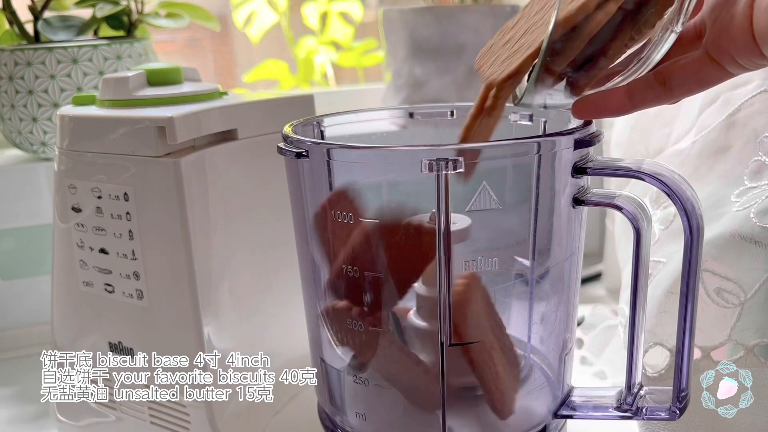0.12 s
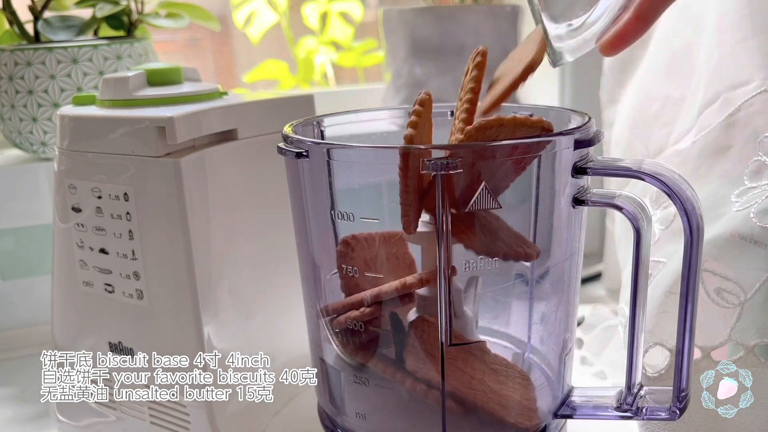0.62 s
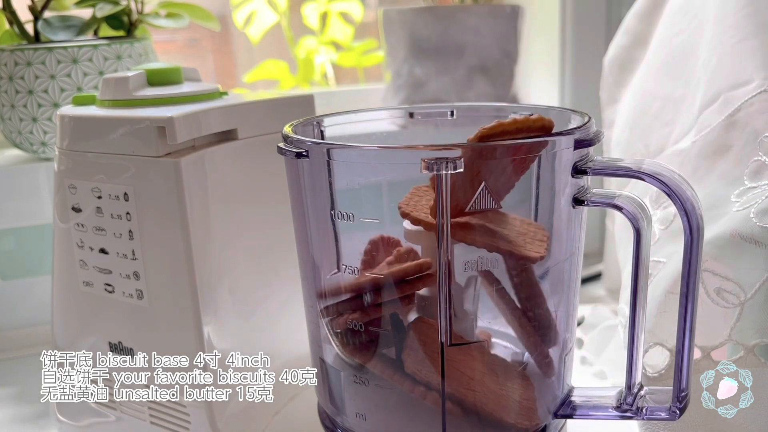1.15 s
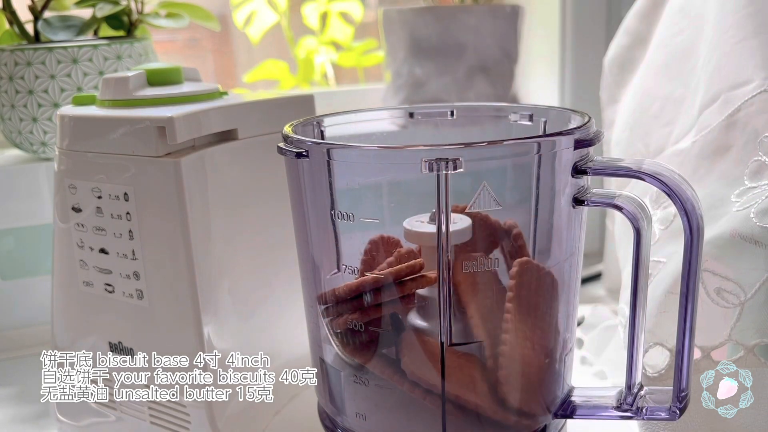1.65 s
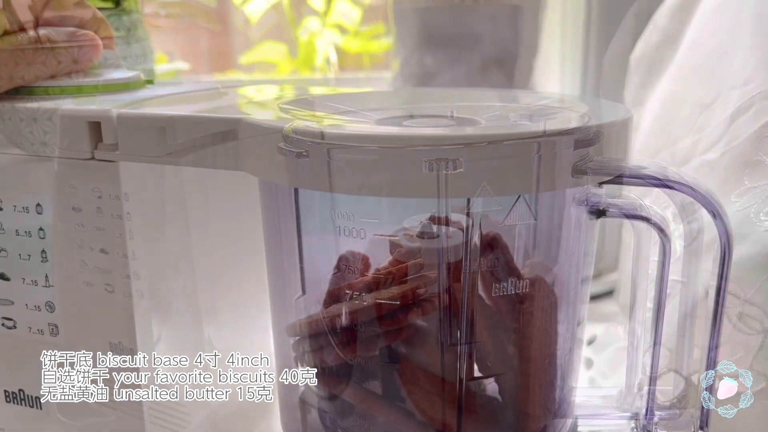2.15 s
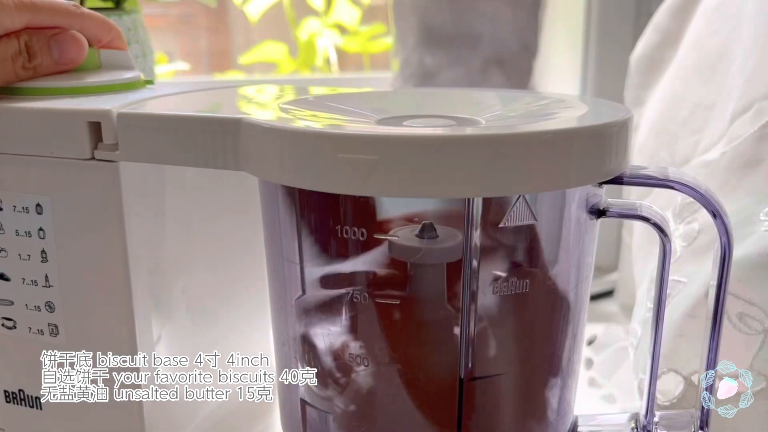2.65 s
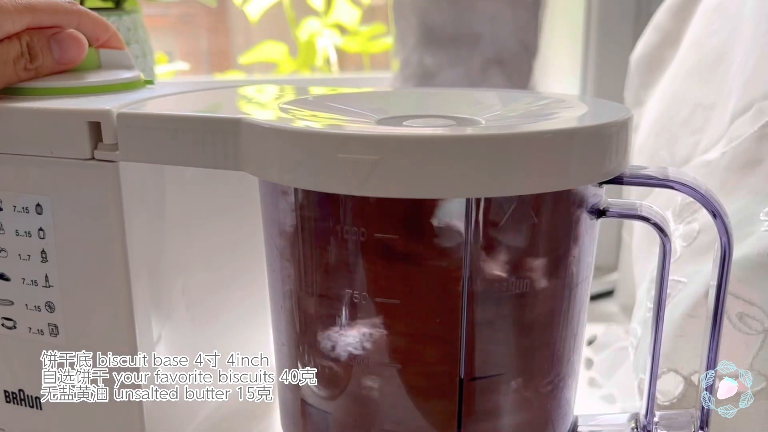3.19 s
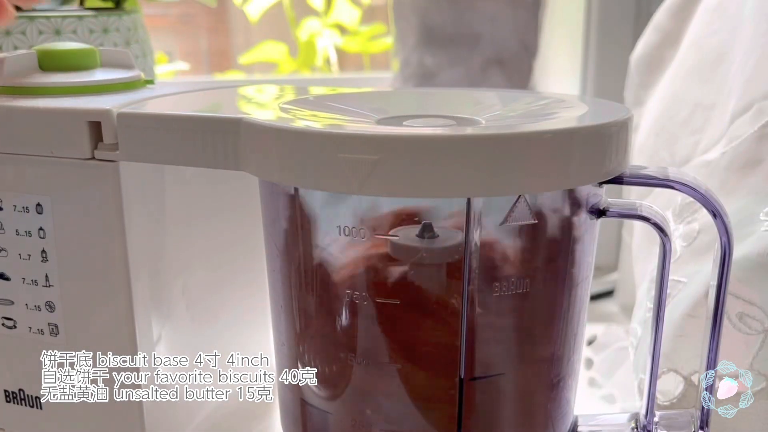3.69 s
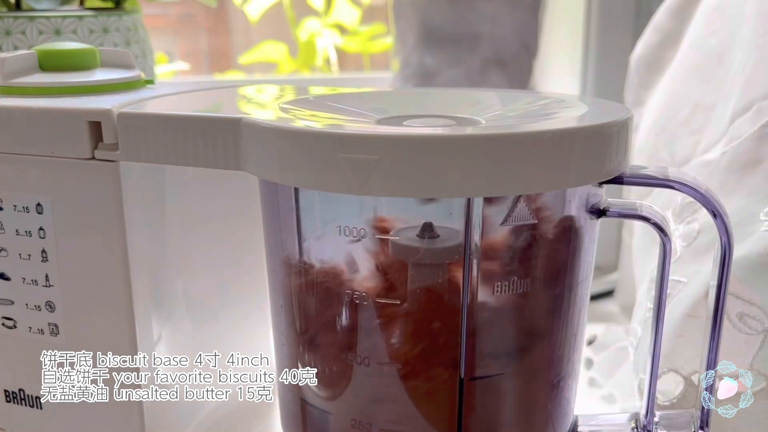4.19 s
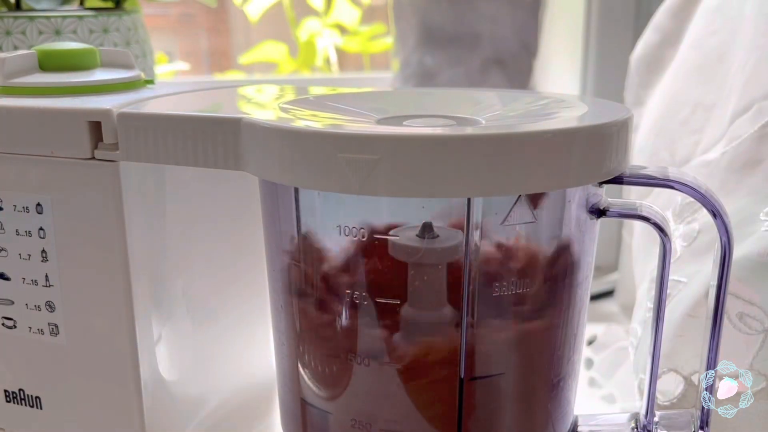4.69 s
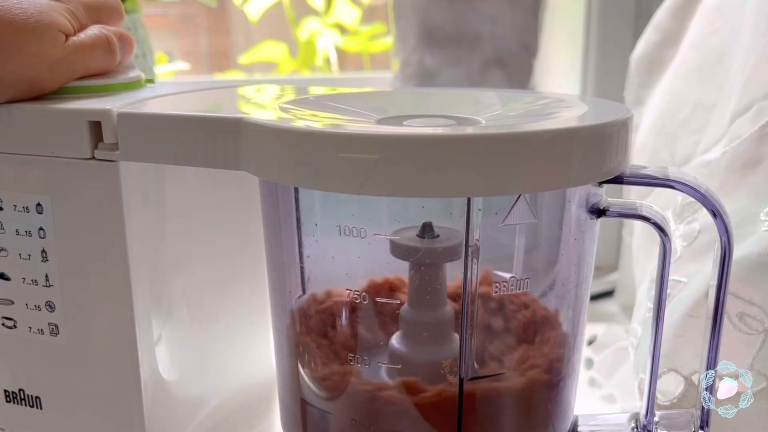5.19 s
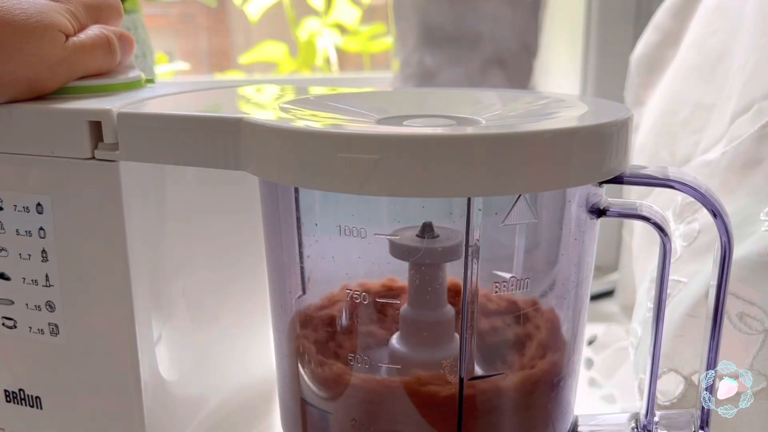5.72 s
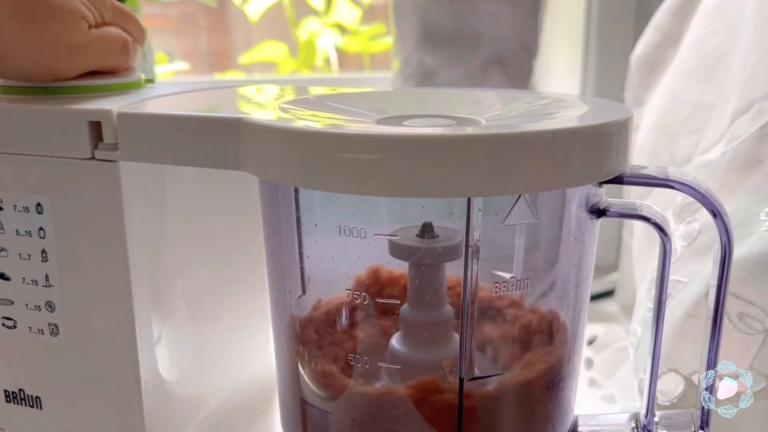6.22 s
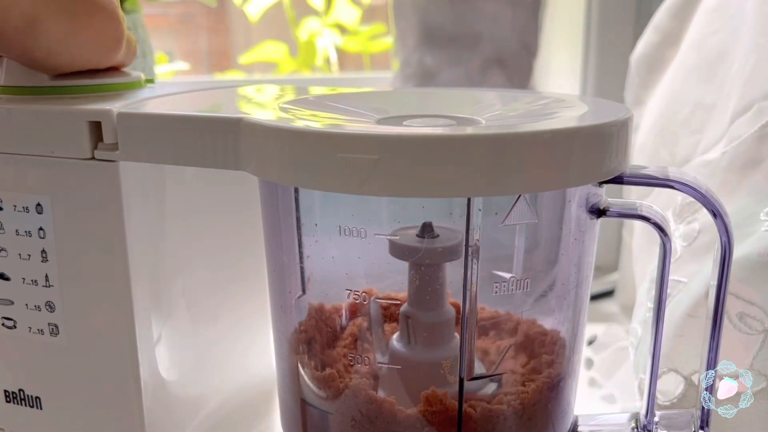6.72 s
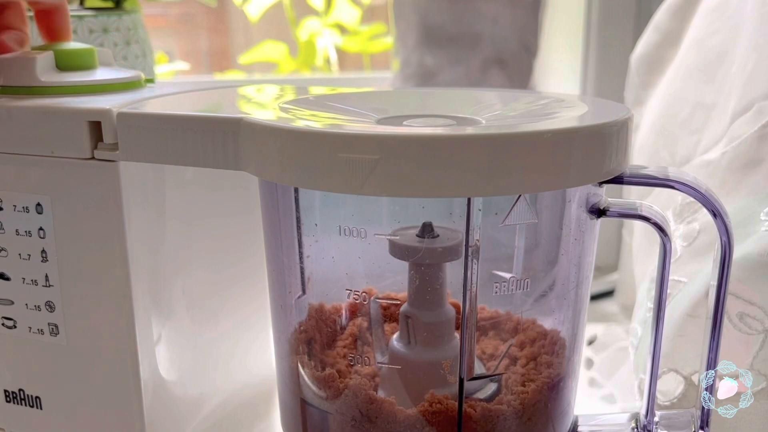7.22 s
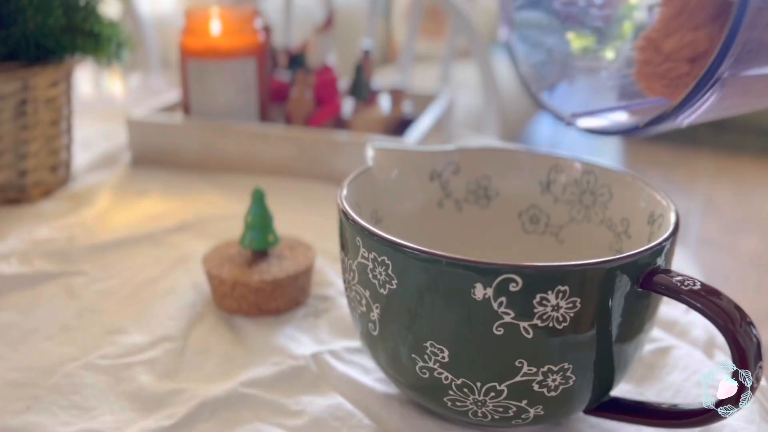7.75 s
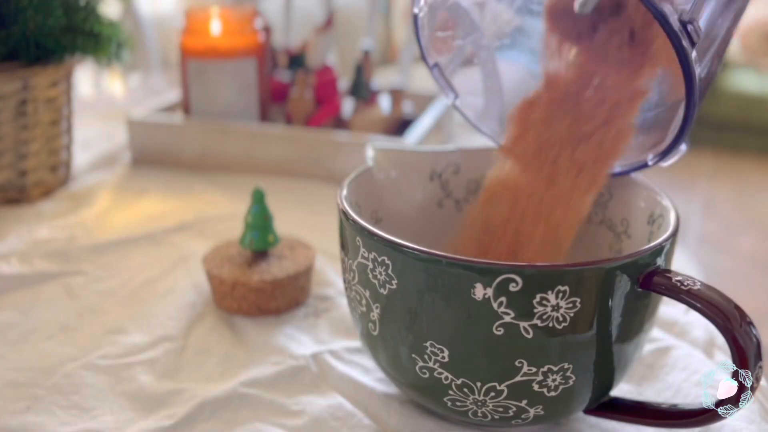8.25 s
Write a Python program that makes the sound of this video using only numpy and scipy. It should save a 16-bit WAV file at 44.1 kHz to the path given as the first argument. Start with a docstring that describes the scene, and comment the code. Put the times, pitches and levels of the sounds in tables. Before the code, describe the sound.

Hard biscuits clatter into a plastic food processor jug, a knob clicks, the blade chops and whirs, then coasts down before crumbs pour out.

```python
"""Hard biscuits tumble into the plastic jug of a food processor: struck modes of jug, hub and blade, with rattle.
The knob clicks and the blade chops them, then stirs the crumbs: impact noise pulsing with the shaft under a
gear whine of mesh tones. The drive coasts to a stop with rumble, catches and squeaks, and the crumbs are
poured out as a dry hiss. Noise echoes stand for the kitchen; background rumble and hiss step in level beneath."""
import sys
import numpy as np
from scipy import signal
from scipy.fft import rfft, irfft, next_fast_len
from scipy.io import wavfile
from scipy.ndimage import uniform_filter1d

SR = 44100
rng = np.random.default_rng(int(sys.argv[2]) if len(sys.argv) > 2 else 0)


def ratio_of_db(decibels):
    """Turn decibels (scalar or array-like) into linear amplitude factors; 0 dB maps to 1."""
    return 10 ** (np.asarray(decibels, float) / 20)


def to_wav(sig):
    """Store sig (one row per channel, or 1-D mono) as 16-bit WAV at the path in sys.argv[1].

    Samples outside -1..1 are clipped; the rate is SR.
    """
    pcm = np.clip(np.atleast_2d(sig), -1, 1) * 32767
    pcm = np.round(pcm).astype(np.int16)
    wavfile.write(sys.argv[1], SR, pcm.T)  # frames by channels


N = 369116

# pieces striking jug and hub, with a late knob click at 6.75: start_s, knock_peak_db, tick_peak_db, hub_spot_hz
BLOWS = [(0.021, -32, -28.5, 2450), (0.032, -16, -47, 1980), (0.054, -34, -20, 1960),
         (.062, -12.5, -39, 1980), (0.078, -41, -38, 1910), (.106, -15, -22, 1730), (.116, -19, -26, 1900),
         (0.134, -23.5, -19, 2420), (0.146, -8, -18, 2190), (.2, -23, -32, 1630), (.231, -24.5, -29, 1618),
         (0.2433, -18, -9.5, 1620), (0.313, -13, -27.5, 2150), (0.363, -33, -22.5, 1920),
         (.404, -31, -33, 1900), (0.45, -32.5, -32, 1920), (0.475, -38.5, -28, 1910),
         (0.491, -28, -65, 1910), (0.508, -18.5, -23, 1770), (0.527, -21, -47, 1910),
         (0.546, -22, -45, 1910), (0.595, -32, -31, 1260), (0.613, -21, -33.5, 1690),
         (0.64, -46, -30, 1630), (0.649, -22, -61, 1630), (0.69, -31.5, -26.5, 1870),
         (.708, -20, -27.5, 1920), (0.783, -25.5, -69, 1910), (.822, -26, -31, 1880),
         (.836, -21.5, -27, 1920), (0.966, -24, -41.5, 1520), (0.987, -26.5, -31, 1910),
         (1.016, -26, -26.5, 1810), (1.041, -24, -26.5, 1930), (1.07, -30, -23, 1730),
         (1.102, -30.5, -32, 1930), (1.127, -29, -34.5, 1630), (1.164, -26, -35, 2130),
         (1.175, -33, -49, 2110), (1.2145, -25.5, -21, 1870), (1.317, -34.5, -72, 1420),
         (1.357, -24.5, -37, 1460), (1.4, -31.5, -20.5, 1690), (1.417, -26.5, -26, 1210),
         (1.448, -34, -20.5, 1730), (1.553, -38.5, -49, 1410), (1.594, -37, -48, 1750),
         (1.641, -27, -41, 1350), (1.68, -40, -58, 1305), (2.699, -27, -35, 1406),
         (2.726, -26.5, -24.5, 2150), (6.652, -33, -54, 1430), (6.691, -49, -71, 1410),
         (6.75, -35, -47.5, 2330)]
# chunks that the blade throws at the hub: start_s, level_db, hub_spot_hz
CHUNKS = [(2.961, -38, 2090), (3.0189, -28.5, 2520), (3.1434, -32, 2390), (3.3053, -35, 2350),
          (3.4087, -39, 2210), (3.579, -31.5, 1760), (3.782, -44, 2440), (3.976, -37, 2200),
          (4.753, -42, 2380), (5.4377, -42, 2110), (5.6793, -43, 2200), (5.7267, -42, 1780),
          (5.8258, -39, 2280), (5.8999, -40, 2180), (5.9637, -43, 1900), (6.18, -40, 2130),
          (6.2483, -39, 2400), (6.489, -41, 2150), (6.628, -40.5, 1650)]
# plastic jug modes, empty and undamped: mode_hz, level_db, t60_s
JUG_MODES = [(345, -15, 0.06), (420, -11, 0.07), (495, -7.5, 0.017), (558, 3, 0.07), (645, 2, 0.04),
             (722, 1, 0.055), (836, -6, 0.06), (960, -2, 0.045), (1090, -5.5, .04), (1190, -4, 0.03)]
# hub modes, undamped: mode_hz, level_db, t60_s
HUB_MODES = [(1230, -4, .025), (1420, -4, 0.035), (1620, -1.5, 0.08), (1765, -1.5, 0.06),
             (1908, -1.5, 0.085), (2106, -4.5, .04), (2330, -3, 0.04)]
# blade modes, undamped: mode_hz, level_db, t60_s
BLADE_MODES = [(2910, -6, .018), (3790, -4, .016), (4470, 0, .018), (4985, -4, .035), (5545, -5, .016),
               (5960, -5, .016)]
# colour of a tick: freq_hz, density_db
TICK_COLOUR = [(1200, -11.5), (2000, -1), (3100, -7), (3700, -8), (4500, -9.5), (5100, -12), (6200, -14.5),
               (8800, -12), (12000, -19), (16000, -18.5)]
FILL_S, FULL_T60_SHARE = 1.3, 0.5  # the filling jug rings ever shorter, down to this share
KNOCK_SPOT_HZ = 535
BLADE_DB = 2.5  # against the tick
HUB_DB = -1.5  # against the mean of knock and tick
CHUNK_TICK_DB, CHUNK_RING_DB = 2.5, -1.5
TICK_CRUMBLE_DB = 6


def blows():
    """Each blow knocks the jug, ticks, snaps on the blade and rings the hub; thrown chunks only tick and ring."""
    out = np.zeros(N)
    for s, knock_db, tick_db, hz in BLOWS:
        t60_share = max(1 - (1 - FULL_T60_SHARE) * s / FILL_S, FULL_T60_SHARE)
        jug = JUG_MODES * np.array([1, 1, t60_share])
        hub_db = (knock_db + tick_db) / 2 + HUB_DB
        add(out, s, ratio_of_db(knock_db) * struck(jug, KNOCK_SPOT_HZ, 7.9, 6.6, contact_samples=330))
        add(out, s, ratio_of_db(tick_db) * crack(TICK_COLOUR, 0.0079, -14.5, 0.069, 2700, 6.1, TICK_CRUMBLE_DB))
        add(out, s, ratio_of_db(tick_db + BLADE_DB) * struck(BLADE_MODES, 4500, 0, 3.5, contact_samples=36))
        add(out, s, ratio_of_db(hub_db) * struck(HUB_MODES, hz, 64, 4.2, contact_samples=200))
    for s, db, hz in CHUNKS:
        tick = crack(TICK_COLOUR, 0.019, -15, 0.2, 3700, 1.0, TICK_CRUMBLE_DB)
        add(out, s, ratio_of_db(db + CHUNK_TICK_DB) * tick)
        add(out, s, ratio_of_db(db + CHUNK_RING_DB) * struck(HUB_MODES, hz, 31, 2.7, contact_samples=200))
    return out


# pieces scraping along the wall: start_s, length_s, level_db
SCRAPES = [(0.103, 0.087, -36), (0.307, 0.049, -28.5), (0.515, 0.012, -33.5), (0.685, 0.042, -32),
           (0.832, 0.047, -47.5), (0.887, 0.13, -47.5), (1.155, 0.0043, -38.5), (1.314, 0.012, -52),
           (1.395, 0.086, -48), (1.512, 0.1, -53.5), (1.629, 0.052, -54.5), (1.712, 0.031, -63.5)]
SCRAPE_RISE_S, SCRAPE_END_DB_PER_S, SCRAPE_GRIT_DB = 0.0066, 498, -10.5
RATTLE_BODY_DB, RATTLE_GRIT_DB, RATTLE_RISE_S, RATTLE_DB_PER_S = -23.5, -43.5, 0.0074, 239.5
# the heap slides down until it has settled
SETTLED_S, HEAP_DB, HEAP_DB_PER_S, HEAP_GRIT_DB, SETTLED_DB_PER_S = 1.24, -37.5, -25.5, -8.5, 156


def tumble():
    """Many small contacts after each blow, in scrapes and as the heap settles, ringing the same plastic."""
    response = ring(JUG_MODES, 0) + 0.1 * ring(HUB_MODES, 0)
    body = high(signal.oaconvolve(grit(1200, 1.7, 3.2, 0.02), response)[:N], 260)
    # treble in four bands that clump independently
    fizz = sum(coloured(grit(1500, 1.8, 4.9, 0.0048),
                        lambda f: read(TICK_COLOUR, f) - 12.0 * np.log2(f / hz + 1e-9) ** 2)
               for hz in (2200, 4630, 8980, 14970))
    t = np.arange(SR // 2) / SR
    rattle = np.minimum(t / RATTLE_RISE_S, 1) * ratio_of_db(-RATTLE_DB_PER_S * t)
    body_gain, fizz_gain = np.zeros((2, N))
    for s, knock_db, tick_db, _ in BLOWS:
        add(body_gain, s, ratio_of_db(knock_db + RATTLE_BODY_DB) * rattle)
        add(fizz_gain, s, ratio_of_db(tick_db + RATTLE_GRIT_DB) * rattle)
    heap = spell(0, SETTLED_S, HEAP_DB, HEAP_DB_PER_S, 0.0011, SETTLED_DB_PER_S)
    scrape = sum(spell(*row, 0, SCRAPE_RISE_S, SCRAPE_END_DB_PER_S) for row in SCRAPES)
    body_gain = body_gain + heap + scrape
    fizz_gain = fizz_gain + ratio_of_db(HEAP_GRIT_DB) * heap + ratio_of_db(SCRAPE_GRIT_DB) * scrape
    return body_gain * level(body, 210, 1800) + fizz_gain * level(fizz, 2700, 11000)


# blade at work, first spell chops, the rest stir crumbs: start_s, length_s, level_db, drift_db_per_s
SPELLS = [(2.693, 2.105, -43, -2), (4.796, .27, -57, 4.5), (5.069, 1.605, -51, 0.4)]
# colour of chopped pieces: freq_hz, density_db
COARSE = [(59, -49), (100, -18), (240, -13.5), (350, -0.5), (471, 0.5), (705, -1.5), (900, -11), (1020, -9),
          (1135, -4), (1300, -14), (1520, -23), (2220, -15.5), (2690, -19.5), (8640, -21), (12400, -24),
          (16000, -23.5)]
# colour of stirred crumbs: freq_hz, density_db
FINE = [(60, -29), (250, -17), (450, 0), (560, -8), (650, -9), (740, -9.5), (880, -17.5), (1150, -11.5),
        (1400, -19), (1850, -17), (2200, -11.5), (2600, -16), (4500, -17.5), (8500, -19.5), (16000, -25.5)]
SHAFT_HZ, TEETH = 28.58, 26
SPIN_UP_S, CHOP_END_DB_PER_S, STOP_DB_PER_S = 0.012, 3000, 295
BITE_S, BITE_DB, BITE_DB_PER_S = 2.712, -49.5, 147  # the blade first bites into whole pieces
SPRAY_DB, BITE_SPRAY_DB = -3.5, 3  # against the body
SURGE_DB = 0.6  # the load surges a few times a second
CRACKLE, THUMPS = 0.35, 0.3  # shares of single snapping crumbs and of single heavy thumps


def churn():
    """Pieces, then crumbs, are flung at the wall: a drumming body and a finer spray pulsing with each turn."""
    t = np.arange(N) / SR
    pulse = 1 + 0.018 * np.cos(2 * np.pi * SHAFT_HZ * t)
    chop = spell(*SPELLS[0], SPIN_UP_S, CHOP_END_DB_PER_S)
    bite = spell(BITE_S, 0, BITE_DB, 0, SPIN_UP_S, BITE_DB_PER_S)
    stages = ((COARSE, chop, bite, 5000, 1.7), (FINE, stirring([0, 0]), 0, 7000, 1.1))
    out = 0
    for colour, load, first_bite, per_s, clump_db in stages:
        spray = grit(per_s, 1.0, clump_db, 0.015) + CRACKLE * grit(500, 0.73, 3.0, 0.005)
        spray = spray * pulse
        drum = 0.89 * spray + grit(per_s, 1.74, 0.45, 0.0081) + THUMPS * grit(150, 2.2, 2.5, 0.012)
        drum = drum * ratio_of_db(SURGE_DB * slow_noise(N, 1500, 1500))
        # crossover at 1600 Hz
        body = coloured(drum, lambda f: read(colour, f) - 40 * np.clip(np.log2(f / 1600 + 1e-9), 0, 3))
        fizz = coloured(spray, lambda f: read(colour, f) + 40 * np.clip(np.log2(f / 1600 + 1e-9), -3, 0))
        fizz_gain = ratio_of_db(SPRAY_DB) * load + ratio_of_db(BITE_SPRAY_DB) * first_bite
        out = out + (load + first_bite) * level(body, 429, 1300) + fizz_gain * level(fizz, 2000, 8300)
    return out


def stirring(relative_db):
    """Gain of the two crumb spells, each shifted by its own amount."""
    return sum(ratio_of_db(db) * spell(*row, SPIN_UP_S, STOP_DB_PER_S) for row, db in zip(SPELLS[1:], relative_db))


# gear mesh tones: mesh_multiple, level_db, sideband_ratio (once a turn)
MESH = [(1, -60.5, .7), (2, -60, .22), (3, -74, .4)]
# housing noise on mesh multiples: mesh_multiple, half_width_hz (6 dB down), level_db
FUZZ = [(3, 120, -66.5), (4, 130, -67), (6, 230, -66.5), (8, 280, -68)]
# low shaft hum: shaft_multiple, level_db
HUM = (3, -74)
# gears against the load in the two crumb spells: level_db
WHINE_DB = [49.5, 50]
FUZZ_FLUTTER_DB = 2.5


def gears():
    """Tooth mesh tones, swelling once a turn, fluttering noise on their multiples and a low shaft hum."""
    drift = slow_noise(N, 2500)
    turn = 2 * np.pi * np.cumsum(SHAFT_HZ * (1 + 0.0011 * drift)) / SR
    whine = sum(ratio_of_db(db) * (1 + 2 * sideband * np.cos(turn)) * np.sin(k * TEETH * turn)
                for k, db, sideband in MESH)
    fuzz = 0
    for k, width, db in FUZZ:
        noise = grit(4000, 3.5, FUZZ_FLUTTER_DB, 0.0095)
        fuzz = fuzz + ratio_of_db(db) * evened(coloured(noise, lambda f: -6 * ((f - k * TEETH * SHAFT_HZ) / width) ** 2))
    hum_multiple, hum_db = HUM
    hum = ratio_of_db(hum_db) * np.sin(hum_multiple * turn)
    return stirring(WHINE_DB) * (np.sqrt(2) * (whine + hum) + fuzz)


# the slowing drive catching: start_s, ring_peak_db
CATCHES = [(6.799, -58), (6.83, -61), (6.844, -62), (6.853, -45), (6.882, -40), (6.918, -51),
           (6.954, -41.5), (7.013, -41.5), (7.056, -62.5), (7.079, -46.5), (7.132, -57.5), (7.157, -43),
           (7.257, -51.5)]
# drive modes, undamped: mode_hz, level_db, t60_s
DRIVE_MODES = [(910, 22, 0.034), (1026, 11.5, 0.031), (1730, 17, 0.03), (1920, 2, 0.017), (3920, 1, 0.018),
               (5580, 10.5, 0.025)]
# colour of the slowing drive: freq_hz, density_db
RUMBLE = [(71, -30.5), (120, -5), (348, -1), (718, -14), (891, -16), (1380, -26), (1940, -26),
          (2630, -36.5), (4870, -32.5), (5530, -32), (9000, -51), (11700, -76), (19800, -120)]
# the belt rubbing to rest: start_s, length_s, level_db, start_hz
SQUEAKS = [(7.165, .05, -74, 2560), (7.172, .07, -81, 3980), (7.228, .08, -71, 2480)]
COAST_S, HALT_S, COAST_DB, COAST_DB_PER_S, COAST_END_DB_PER_S = 6.851, 7.39, -55, -19, 124
DRIVE_RATTLE_DB = -13  # loose parts buzzing, against the rumble
CATCH_TICK_DB = -19  # broad click of a catch, against its ring
SQUEAK_SAG_HZ_PER_S = 860
CLUNK_CRUMBLE_DB = 3


def coast():
    """The drive runs down: a fading rumble with buzzing parts, ringing catches and broken rubbing squeaks."""
    gain = spell(COAST_S, HALT_S - COAST_S, COAST_DB, COAST_DB_PER_S, 0.00079, COAST_END_DB_PER_S)
    rumble = level(coloured(grit(3000, 2.8, 1.2, 0.0072), lambda f: read(RUMBLE, f)), 287, 1200)
    buzz = evened(signal.oaconvolve(grit(260, 2.2, 2.5, 0.007), ring(DRIVE_MODES[:4], 0))[:N])
    out = gain * (rumble + ratio_of_db(DRIVE_RATTLE_DB) * buzz)
    for s, db in CATCHES:
        click = crack(TICK_COLOUR, 0.01, -22, 0.036, 800, 2.6, CLUNK_CRUMBLE_DB)
        add(out, s, ratio_of_db(db) * struck(DRIVE_MODES, 1800, 0, 1.5, contact_samples=10))
        add(out, s, ratio_of_db(db + CATCH_TICK_DB) * click)
    for s, length, db, hz in SQUEAKS:
        t = np.arange(N) / SR - s
        slip = 0.73 + slow_noise(N, 130, 80)
        tone = np.sin(2 * np.pi * (hz - SQUEAK_SAG_HZ_PER_S / 2 * t) * t)
        out += spell(s, length, db, -41, 0.0045, 700) * evened(slip * tone)
    return out


# the speed knob snapping over its stops: start_s, peak_db
KNOB = [(2.569, -56.5), (2.585, -37.5), (2.588, -33), (7.352, -47), (7.359, -46), (7.37, -49),
        (7.408, -59.5), (7.838, -66.5)]
# colour of a knob clunk: freq_hz, density_db
CLUNK = [(88, -40.5), (150, -7.5), (442, 1), (753, -15.5), (1070, -8.5), (1260, -22.5), (2250, -18.5),
         (2770, -25), (12000, -39.5), (15600, -70), (22000, -120)]


def knob():
    """Short broad clunks of noise without a ring."""
    out = np.zeros(N)
    for s, db in KNOB:
        add(out, s, ratio_of_db(db) * crack(CLUNK, 0.044, -26.5, 0.58, 336, 3.1, CLUNK_CRUMBLE_DB))
    return out


# crumbs sliding, first row in the jug, the rest into a cup: start_s, length_s, level_db, drift_db_per_s, rise_s
POURS = [(1.924, .18, -62.5, 8, 0.037), (7.95, .5, -66.5, 7, 0.009), (7.78, 0.226, -75.5, 11, 0.017)]
# colours of the slide, jug then cup: freq_hz, density_db
SLIDE = [
    [(410, -11.5), (700, -2.5), (3690, -7.5), (6650, -4), (9110, -7), (10500, -18.5), (16000, -16.5)],
    [(880, -71.5), (1500, -26.5), (4920, -7), (10600, -4), (13900, -15), (14500, -3.5), (16000, -8)],
]
POUR_END_DB_PER_S = 192


def pours():
    """A fine dry hiss of sliding crumbs, first in the jug, then into a cup."""
    jug, cup = [level(coloured(grit(6300, 0.66, 0.75, 0.0092), lambda f: read(colour, f)), 2800, 9600)
                for colour in SLIDE]
    gains = [spell(*row, POUR_END_DB_PER_S) for row in POURS]
    return gains[0] * jug + sum(gains[1:]) * cup


def scatter(x, t60_s, start_s):
    """Reflections as decaying noise; three random responses fade over one another in turn."""
    t, turn = np.arange(SR // 2) / SR, np.pi * np.arange(N) / (0.21 * SR)
    taps = rng.standard_normal((3, len(t))) * ratio_of_db(-60 * t / t60_s) * (t > start_s)
    fed = [x * np.sqrt(2 / 3) * np.cos(turn + k * np.pi / 3) for k in range(3)]
    return signal.oaconvolve(fed, taps / np.linalg.norm(taps[0]), axes=1).sum(0)[:N]


# colour of the background: freq_hz, density_db
AIR = [(18, -43), (30, -19.5), (54, -2.5), (103, -3), (217, -12.5), (400, -16.5), (700, -31), (1700, -42.5),
       (2600, -51), (6000, -52.5), (14000, -57.5)]
# background rumble and hiss, one row a stretch; the early hiss includes the settling heap:
# start_s, rumble_db, hiss_db, drift_db_per_s
AIR_LEVELS = [(0, -48.5, -43.5, -15), (1.3, -57.5, -63, -8.5), (1.7, -57, -74.5, -7.5),
              (2.452, -79.5, -100, 18), (2.7, -69, -72, -2), (4.796, -78, -84, 4),
              (6.847, -65.5, -77, -0.5), (7.86, -76.5, -90, 3.5)]
# faint fuzzy tone: centre_hz, half_width_hz (12 dB down), level_db (against the hiss)
WHISTLE = (3980, 130, -15)
# wavering hum: centre_hz, half_width_hz (12 dB down), level_db (against the rumble)
DRONE = (91, 15, -5.5)


def air():
    """Background rumble with a drone and hiss with a faint whistle, all filtered noise, stepping in level."""
    whistle_hz, whistle_width, whistle_db = WHISTLE
    drone_hz, drone_width, drone_db = DRONE
    whistle = evened(coloured(rng.standard_normal(N), lambda f: -12 * ((f - whistle_hz) / whistle_width) ** 2))
    rumble = coloured(rng.standard_normal(N), lambda f: read(AIR, f) - 3 * (f / 700) ** 2)
    hiss = high(coloured(rng.standard_normal(N), lambda f: read(AIR, f)), 700)
    drone = evened(coloured(rng.standard_normal(N), lambda f: -12 * ((f - drone_hz) / drone_width) ** 2))
    rumble = level(rumble, 40, 160) + ratio_of_db(drone_db) * drone
    hiss = level(hiss, 670, 3500) + ratio_of_db(whistle_db) * whistle
    t, rows = np.arange(N) / SR, np.array(AIR_LEVELS)
    row_now = np.maximum(np.searchsorted(rows[:, 0], t, "right") - 1, 0)
    start, rumble_db, hiss_db, db_per_s = rows[row_now].T
    return ratio_of_db(db_per_s * (t - start)) * (ratio_of_db(rumble_db) * rumble + ratio_of_db(hiss_db) * hiss)


# each strike detunes its modes a little at random and shortens rings to no less than this share
DETUNE, LEAST_T60_SHARE = 0.01, 0.55


def struck(modes, hz, narrow_db, vary_db, contact_samples):
    """Rings the modes near the pitch of the struck spot; a rough edge lands over some samples."""
    octaves_off = abs(np.log2(np.transpose(modes)[0] / hz))
    near_db = -narrow_db * octaves_off + vary_db * rng.standard_normal(len(modes))
    push = 0.56 * (hz < 900)  # only low knocks push steadily
    landing = signal.windows.hann(contact_samples) * (push + rng.standard_normal(contact_samples))
    varied = modes * np.array([1 + DETUNE * rng.standard_normal(), 1, rng.uniform(LEAST_T60_SHARE, 1)])
    return peaked(high(signal.oaconvolve(ring(varied, near_db), landing), 350))


def ring(modes, shift_db):
    """Sum of decaying sines: the place that is hit sets how strongly each mode answers."""
    hz, db, t60 = np.transpose(modes)[:, :, None]
    t = np.arange(6000) / SR
    decay = ratio_of_db(db + np.reshape(shift_db, (-1, 1)) - 60 * t / t60)
    return (decay * np.sin(2 * np.pi * hz * t)).sum(0)


def crack(colour, t60_s, tail_db, tail_t60_s, low_hz, ripple_db, crumble_db):
    """A crumbly burst of noise with a weaker rattle behind it; each piece has its own uneven colour."""
    t, bumps = np.arange(4096) / SR, ripple_db * rng.standard_normal(30)
    burst = coloured(rng.standard_normal(len(t)),
                     lambda f: read(colour, f) + np.interp(np.sqrt(f / 25), range(30), bumps))
    crumbs = ratio_of_db(crumble_db * slow_noise(len(t), 60))
    onset = 1 - np.exp(-t / 0.00052)
    decay = ratio_of_db(-60 * t / t60_s) + crumbs * ratio_of_db(tail_db - 60 * t / tail_t60_s)
    return peaked(high(burst * onset * decay, low_hz))


def grit(per_s, spread_db, clump_db, clump_s):
    """Tiny impacts of uneven size that come in clumps, at rms 1."""
    clump = slow_noise(N, int(clump_s * SR), int(clump_s * SR))
    size = ratio_of_db(spread_db * np.minimum(rng.exponential(1, N), 5) + clump_db * clump)
    return evened(size * rng.standard_normal(N) * (rng.random(N) < per_s / SR))


def slow_noise(count, *spans):
    """Noise smoothed over each span of samples in turn, at rms 1."""
    x = rng.standard_normal(count)
    for span in spans:
        x = uniform_filter1d(x, span)
    return evened(x)


def spell(start_s, length_s, db, db_per_s, rise_s, end_db_per_s):
    """Gain over time: a rise, a slow drift in dB, then a steady fall."""
    t = np.arange(N) / SR - start_s
    drift = db + db_per_s * np.clip(t, 0, length_s) - end_db_per_s * np.maximum(t - length_s, 0)
    return np.clip(t / rise_s, 0, 1) * ratio_of_db(drift)


def add(mix, s, sound):
    """Mixes a sound in at a time."""
    part = mix[round(s * SR):][:len(sound)]
    part += sound[:len(part)]


def evened(x):
    """Scales to rms 1."""
    return x / np.sqrt(np.mean(x ** 2) + 1e-20)


def peaked(x):
    """Scales to peak 1."""
    return x / abs(x).max()


def level(x, lo_hz, hi_hz):
    """Scales x so that one band has rms 1."""
    return x / np.std(signal.sosfilt(signal.butter(4, [lo_hz, hi_hz], "band", fs=SR, output="sos"), x))


def high(x, hz):
    """Steep high-pass."""
    return signal.sosfilt(signal.butter(3, hz, "high", fs=SR, output="sos"), x)


def read(points, hz):
    """Reads a spectrum table on a log axis."""
    f, value = np.transpose(points)
    return np.interp(np.log(hz + 1), np.log(f + 1), value)


def coloured(x, db):
    """Filters x by a function of frequency in dB."""
    size = next_fast_len(len(x))
    return irfft(rfft(x, size) * ratio_of_db(db(np.fft.rfftfreq(size, 1 / SR))), size)[:len(x)]


# left-right likeness: freq_hz, likeness (0-1)
LIKENESS = [(60, 0.94), (250, 0.94), (1000, 0.62), (4000, 0.58), (12000, 0.75)]
# left over right: freq_hz, tilt_db
TILT = [(150, 0), (600, 0), (2400, -3.5), (6000, -3), (10000, 0)]
KITCHEN_DB, KITCHEN_T60_S = -12.5, 0.17
LEFT_LAG_SAMPLES = 0.95


def scene():
    """All sources; everything but gears and air has the kitchen's echo.
    Left and right differ in scattered reflections, air, a treble tilt and a tiny lag."""
    near = blows() + tumble() + knob() + churn() + coast() + pours()
    mono = near + ratio_of_db(KITCHEN_DB) * scatter(near, KITCHEN_T60_S, 0.0056) + gears()
    size = next_fast_len(N)
    hz = np.fft.rfftfreq(size, 1 / SR)
    half_angle = np.arccos(np.clip(read(LIKENESS, hz), 0, 1)) / 2
    mid = np.cos(half_angle) * rfft(mono + air(), size)
    side = np.sin(half_angle) * rfft(scatter(mono, 0.048, 0) + air(), size)
    # half the tilt and lag on each channel
    skew = ratio_of_db(read(TILT, hz) / 2) * np.exp(-1j * np.pi * hz * LEFT_LAG_SAMPLES / SR)
    return irfft([(mid + side) * skew, (mid - side) / skew], size)[:, :N]


# two narrow treble gaps and the band limit: centre_hz, width_hz
GAPS = [(10500, 800), (13900, 1300), (19000, 6300)]


def gaps_db(hz):
    """Gain of the treble gaps and the band limit: 50 dB down, with 200 Hz wide edges."""
    return sum(-50 * np.clip((width / 2 - abs(hz - f)) / 200 + 0.5, 0, 1) for f, width in GAPS)


def band_limit(x):
    """A steep low-pass at the top of the band."""
    return signal.sosfilt(signal.butter(12, 16990, fs=SR, output="sos"), x)


def record(dry):
    """Cuts the treble gaps and the band limit out of both channels."""
    mix = np.array([coloured(x, gaps_db) for x in dry])
    return band_limit(mix)


dry = scene()
out = record(dry)
to_wav(out)
```